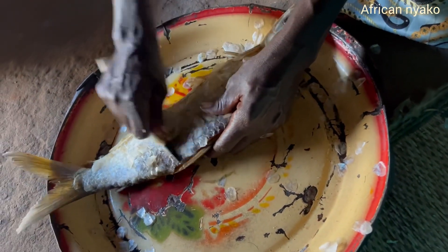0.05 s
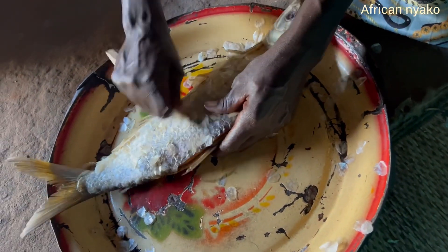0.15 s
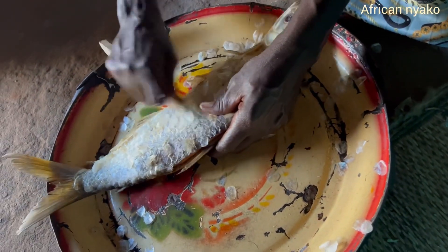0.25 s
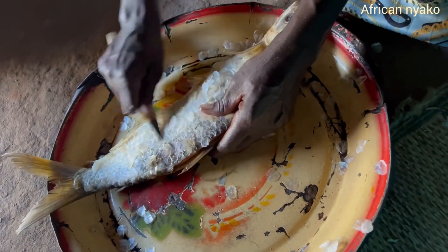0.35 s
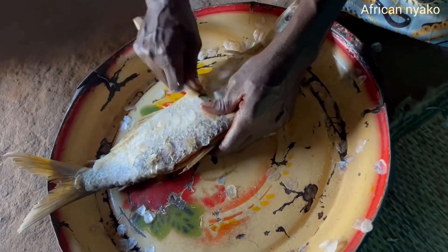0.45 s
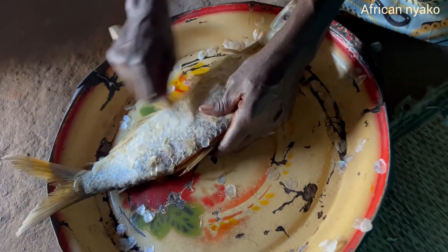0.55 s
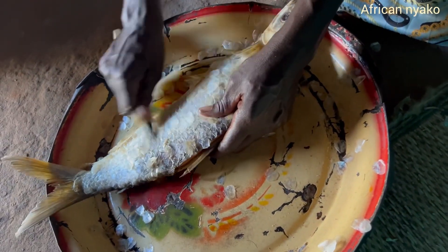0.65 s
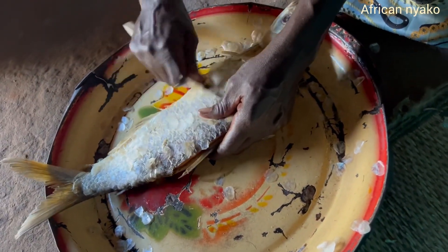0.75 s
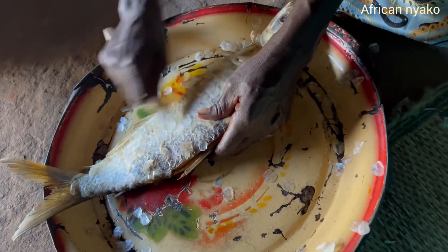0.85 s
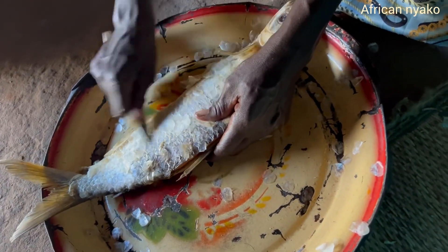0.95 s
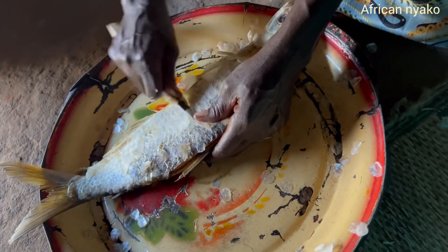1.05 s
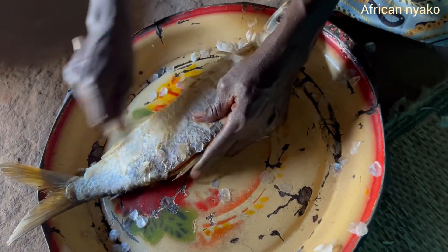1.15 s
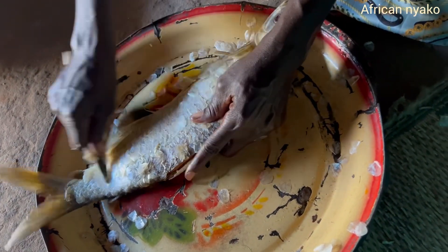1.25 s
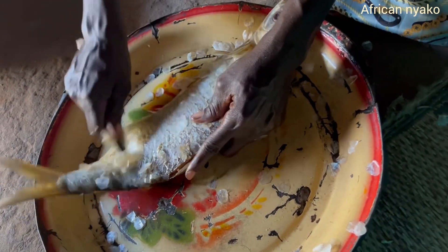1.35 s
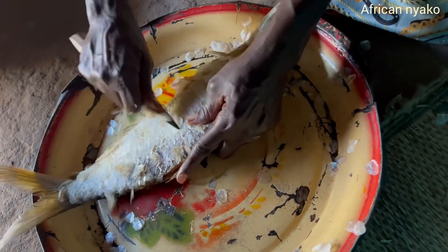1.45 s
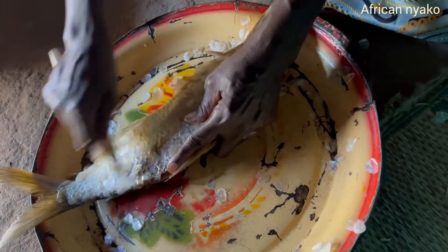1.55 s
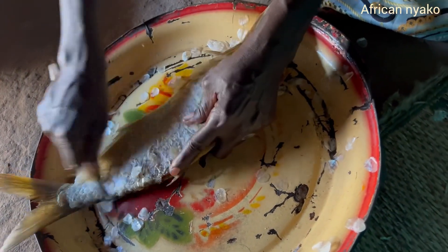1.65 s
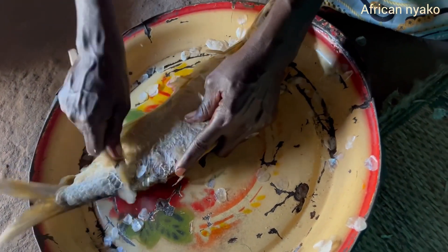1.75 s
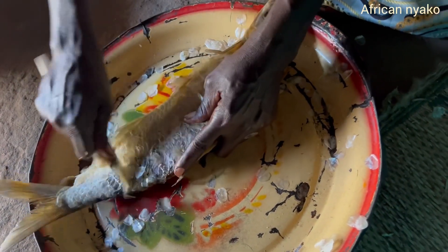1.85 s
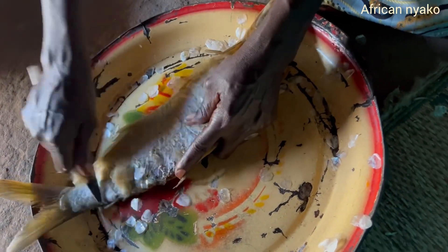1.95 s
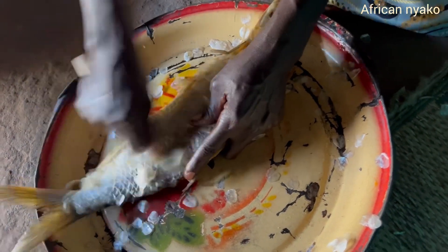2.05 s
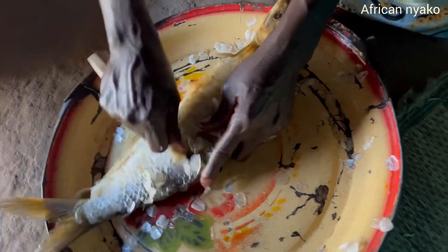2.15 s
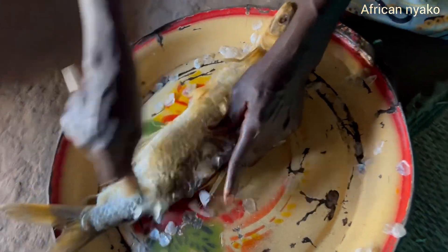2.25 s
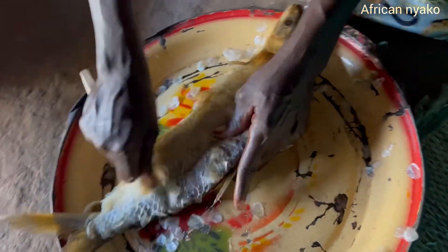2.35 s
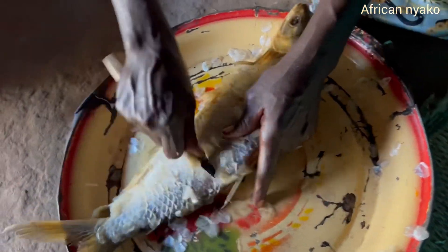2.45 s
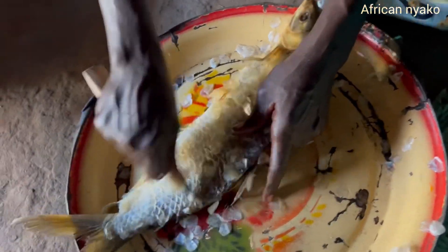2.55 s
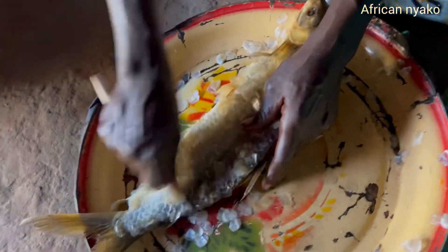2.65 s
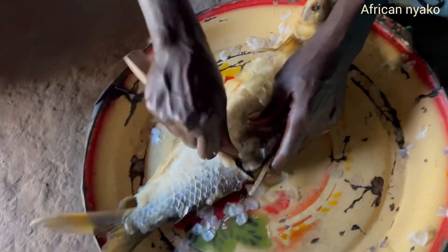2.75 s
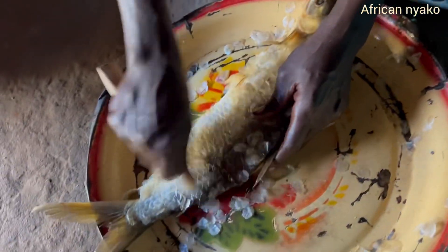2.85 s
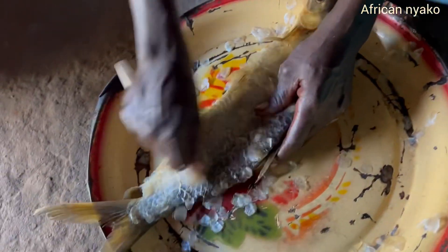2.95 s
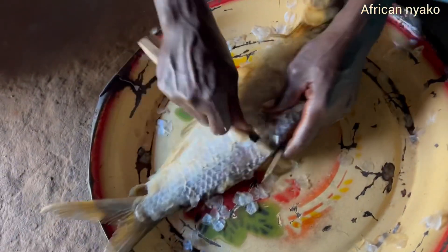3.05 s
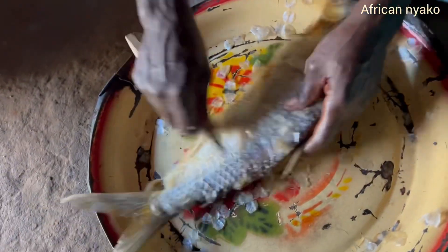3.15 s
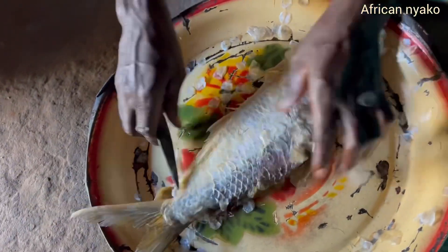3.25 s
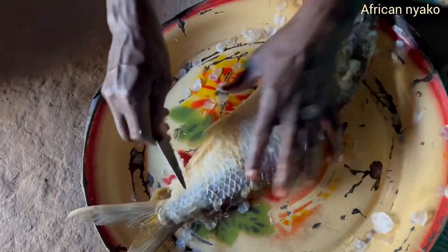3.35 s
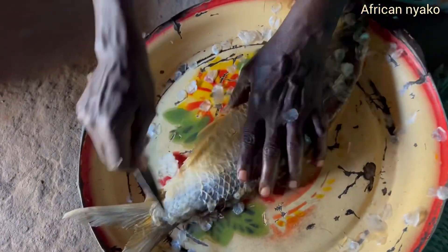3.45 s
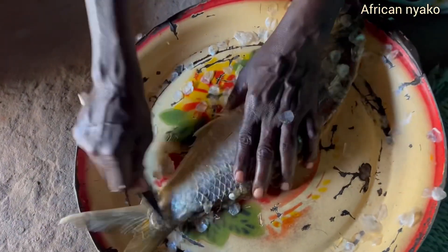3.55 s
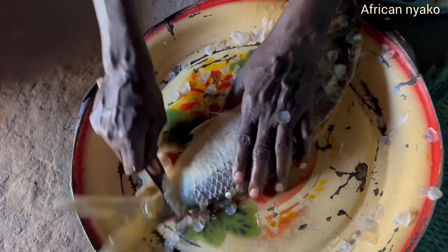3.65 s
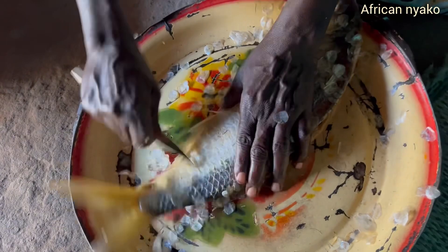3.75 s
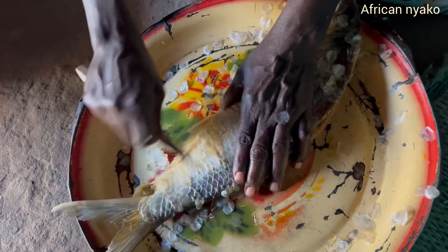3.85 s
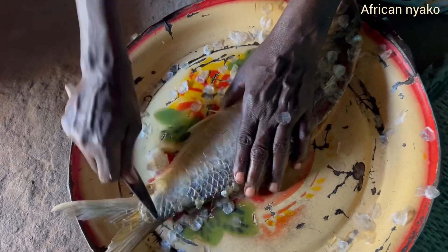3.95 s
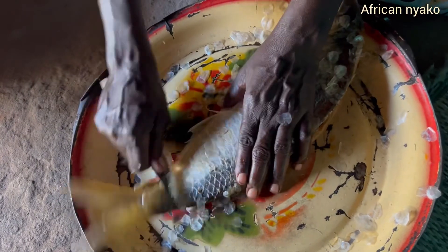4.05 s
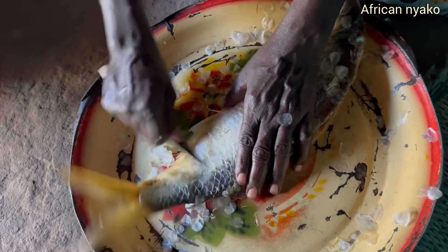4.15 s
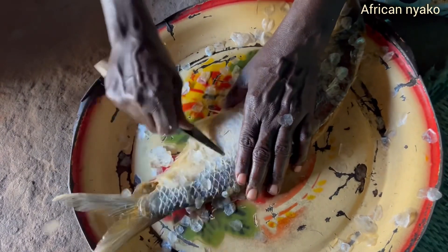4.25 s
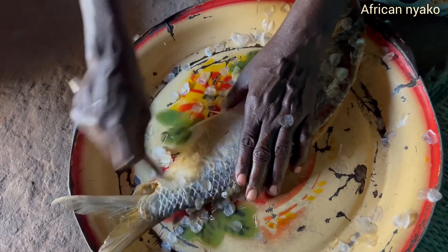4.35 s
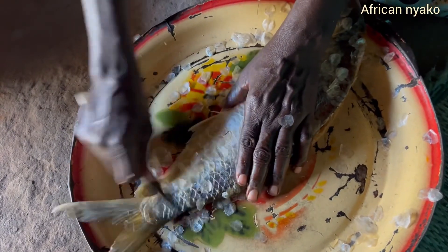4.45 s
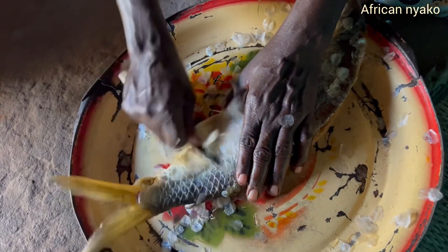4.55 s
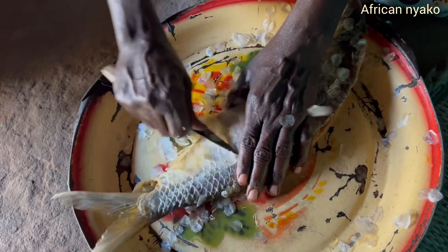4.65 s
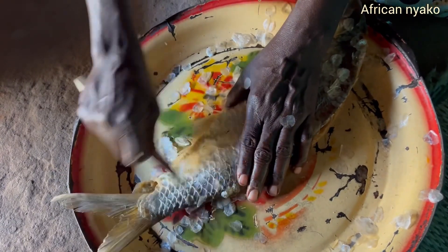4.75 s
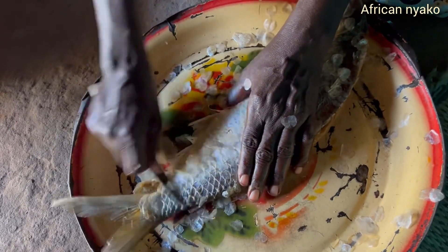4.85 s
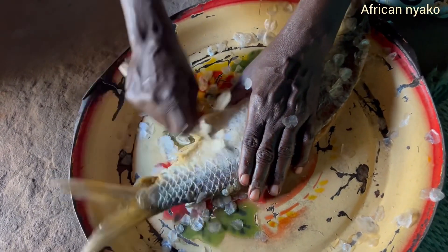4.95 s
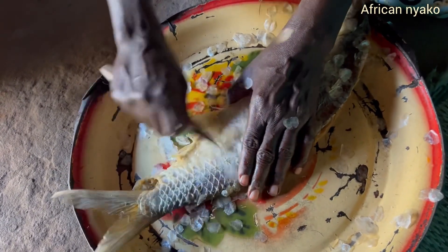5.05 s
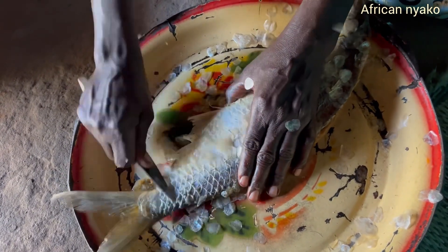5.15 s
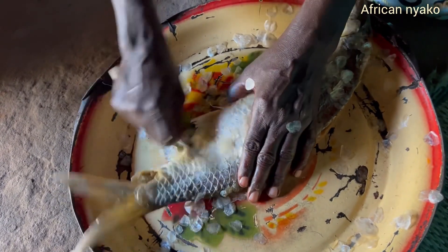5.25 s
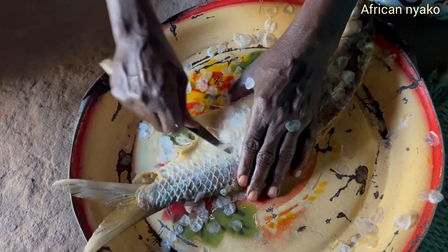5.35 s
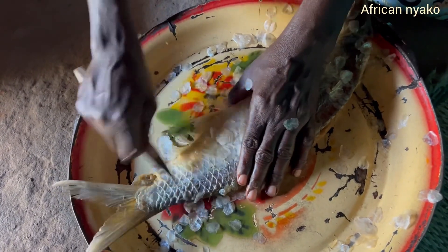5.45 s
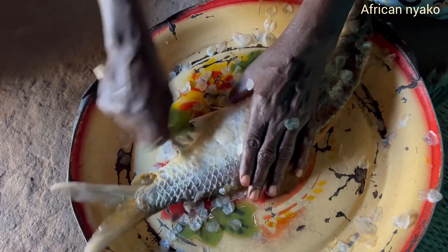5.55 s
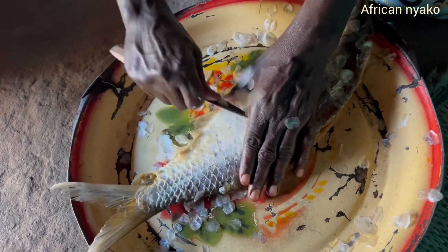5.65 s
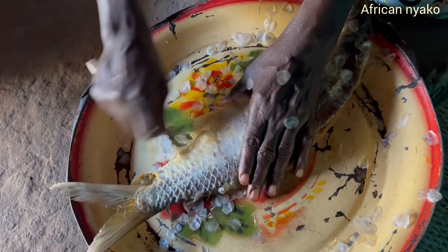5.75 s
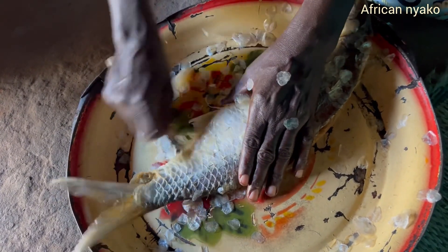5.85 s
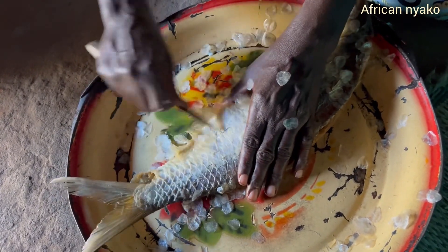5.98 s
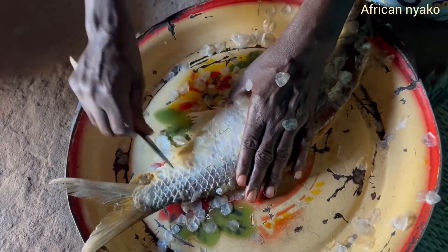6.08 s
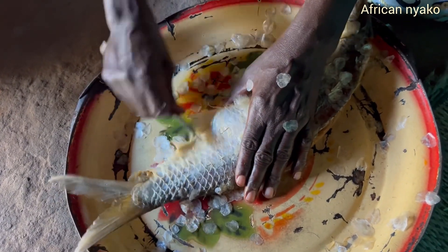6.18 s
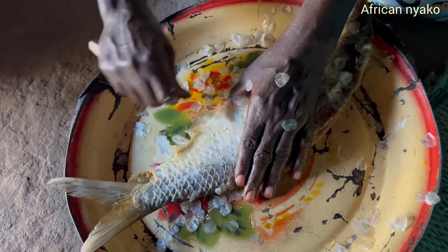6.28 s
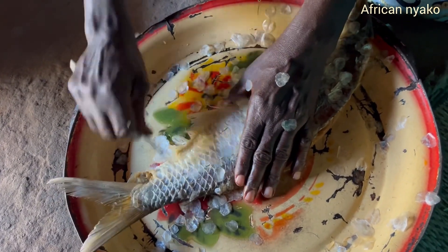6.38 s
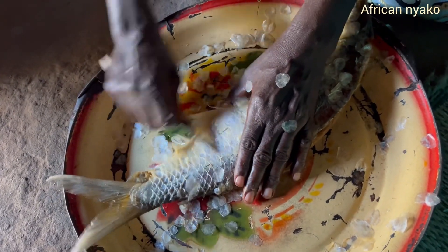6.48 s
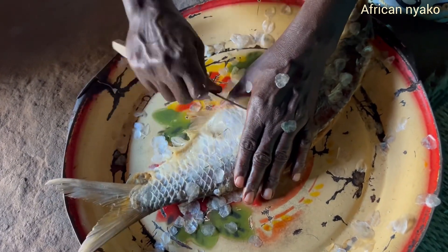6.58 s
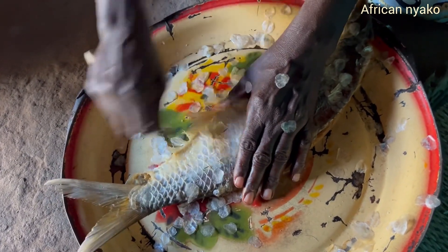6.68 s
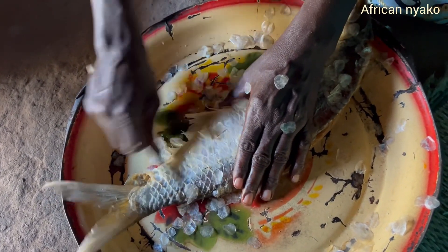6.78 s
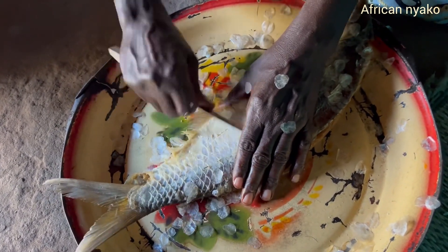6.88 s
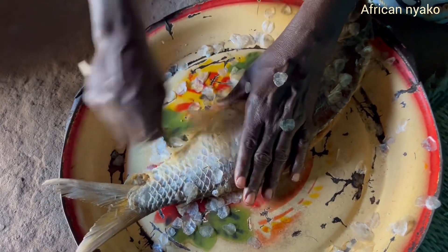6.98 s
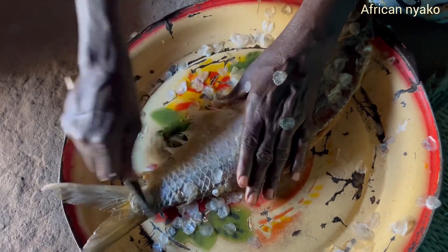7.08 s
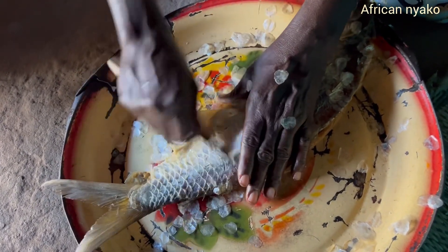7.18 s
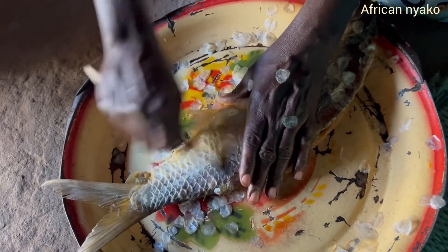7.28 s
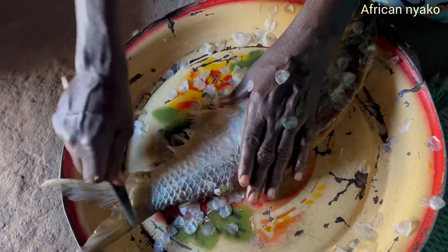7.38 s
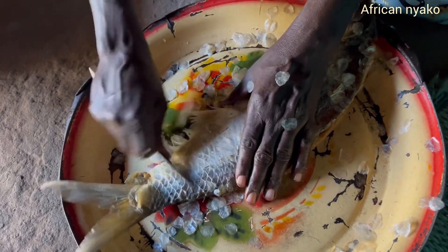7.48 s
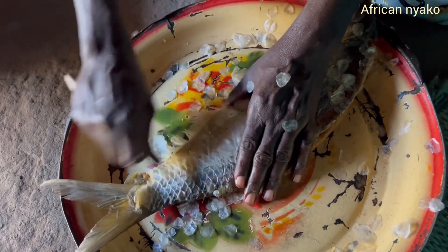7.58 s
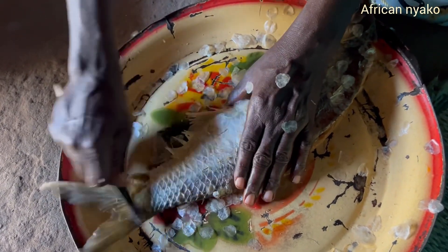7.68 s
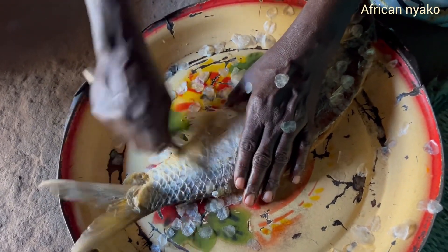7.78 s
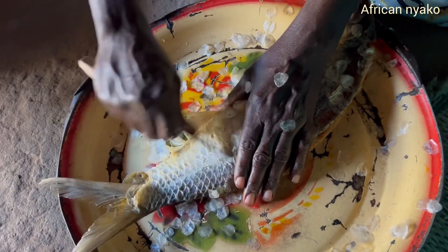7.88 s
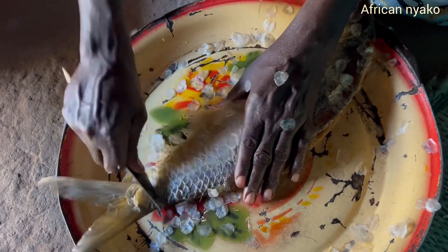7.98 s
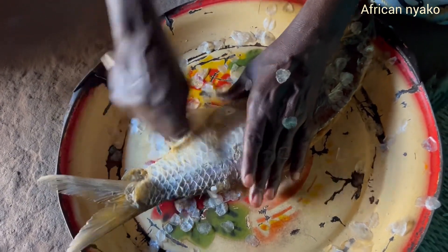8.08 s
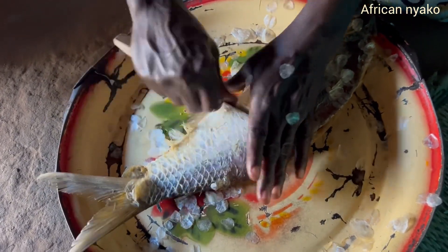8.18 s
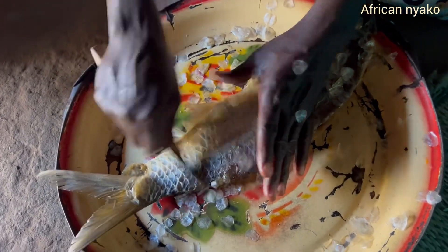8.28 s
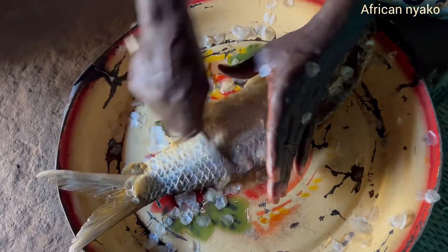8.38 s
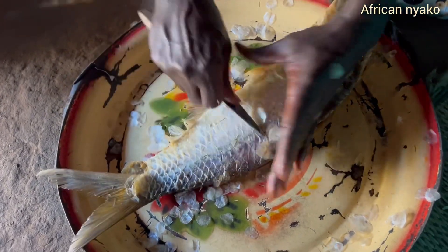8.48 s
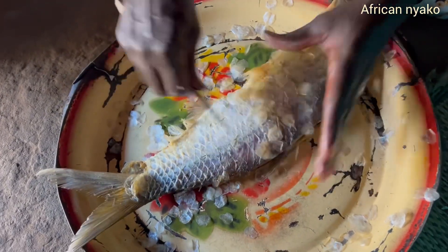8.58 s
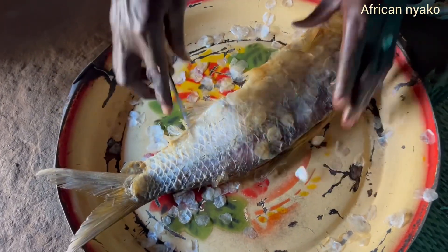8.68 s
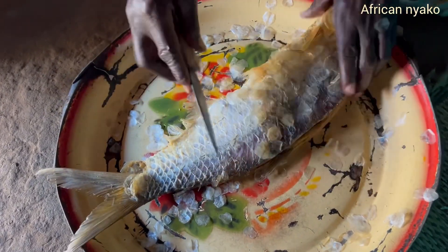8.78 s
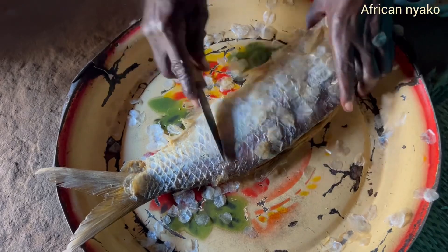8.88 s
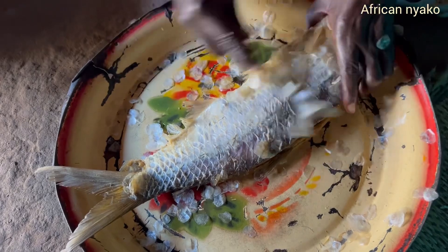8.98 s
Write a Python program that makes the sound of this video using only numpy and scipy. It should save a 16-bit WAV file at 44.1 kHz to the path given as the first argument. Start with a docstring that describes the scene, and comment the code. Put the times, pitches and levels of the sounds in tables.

```python
"""A blade rasps at once over a dried fish in an enamel basin, in a yard with a low rumble underneath.
The phone stands close: each stroke is fine cracks over a duller rub, and scales snap loose in bursts.
Blows on the basin ring briefly; the fish judders against it with groans that fall in pitch.
The knife clacks as it lands or slips off; one even scrape and one soft bump come later.
Hands, basin sides and nearby walls throw the sound back; an engine and a drone hum far off."""
import sys
import numpy as np
from scipy import signal
from scipy.fft import rfft, irfft, next_fast_len
from scipy.io import wavfile
from scipy.ndimage import uniform_filter1d, map_coordinates

SR = 44100
rng = np.random.default_rng(int(sys.argv[2]) if len(sys.argv) > 2 else 0)


def store_pcm(level_fs):
    """Save levels as 16-bit WAV."""
    pcm = np.round(np.clip(level_fs, -1, 1) * 32767).astype(np.int16)
    wavfile.write(sys.argv[1], SR, np.atleast_2d(pcm).T)


N = 397776  # length in samples
TOP_HZ = 16000  # upper band limit of the phone

# Spectrum of the cracking scales: frequency_hz, level_db (relative)
SCALE_SPECTRUM = [(600, -33.5), (1800, -15.5), (3300, -3), (5000, -2.5), (7300, 2), (9500, -1),
                  (11800, 4.5), (13500, -0.5), (15600, -0.5), (17000, 0.5)]
# Spectrum of the rubbed skin: frequency_hz, level_db (relative)
SKIN_SPECTRUM = [(50, -31.5), (130, 9), (260, 1.5), (390, 3), (480, -5), (650, 4), (900, -4.5),
                 (1150, -1.5), (1550, -1.5), (2000, -14), (3200, -11.5), (5000, -19), (9000, -27)]


def amp(db):
    """Decibels to gain."""
    return 10 ** (np.asarray(db) / 20)


def unit(x):
    """Scale to rms 1."""
    return x / np.sqrt(np.mean(x ** 2) + 1e-20)


def along(points, hz):
    """Read (Hz, value) points on a log frequency axis."""
    f, v = np.transpose(points)
    return np.interp(np.log(hz + 1), np.log(f + 1), v)


def wobble(rate):
    """A smooth random curve with this many knots a second."""
    knots = rng.standard_normal(int(N * rate / SR) + 4)
    return map_coordinates(knots, [np.arange(N) * rate / SR])


def filtered(x, response):
    """Multiply the spectrum of x by a response of frequency."""
    n = x.shape[-1]
    m = next_fast_len(n + 8192)
    return irfft(rfft(x, m) * response(np.fft.rfftfreq(m, 1 / SR)), m)[..., :n]


def coloured(x, spectrum, size=4096):
    """Pass x through a causal, minimum-phase filter with this spectrum."""
    gain = amp(along(spectrum, np.fft.rfftfreq(size, 1 / SR)))
    cepstrum = irfft(np.log(gain))
    # folding the cepstrum forward in time makes the filter causal
    cepstrum[1:size // 2] *= 2
    cepstrum[size // 2 + 1:] = 0
    return signal.fftconvolve(x, irfft(np.exp(rfft(cepstrum))))[:len(x)]


def grains(n, rate, spread_db):
    """Tiny random impulses, rate a second, of uneven size and either sign; rms 1."""
    chance, size, push = rng.random(n), rng.standard_normal(n), rng.choice([-1, 1], n)
    return unit((chance < rate / SR) * push * amp(spread_db * np.clip(size, -2, 2)))


def add(track, s, sound):
    """Mix a sound into the track at time s."""
    start = max(round(s * SR), 0)
    track[start:start + len(sound)] += sound[:max(N - start, 0)]


def yard():
    """A slowly swelling low rumble of the surroundings, almost the same at both microphone ports."""
    # rumble: frequency_hz, level_db (relative)
    rumble_spectrum = [(20, -25), (35, -19), (55, 7.5), (90, 7), (135, 1), (175, -3.5), (250, -7.5),
                       (500, -24), (1400, -38), (2500, -41), (8000, -58), (16000, -58.5)]
    shared = unit(coloured(rng.standard_normal(N), rumble_spectrum))
    apart = np.array([unit(coloured(rng.standard_normal(N), rumble_spectrum)) for port in range(2)])
    return amp(-51.0 + 2.0 * wobble(3.89)) * (shared + 0.14 * apart)


def far_hum():
    """A distant engine, slowly rising in pitch, and a drone that comes and goes: plain, slightly wavering tones."""
    # engine: time_s, pitch_hz, level_db (rms)
    engine_points = [(0, 123.2, -58.5), (2.4, 127.9, -45.5), (3.6, 133.1, -51), (6.4, 139.1, -56.5),
                     (9, 143.6, -59)]
    # drone: peak_s, half_length_s (to 1/e of the peak), level_db (rms at the peak)
    drone_swells = [(2.478, 0.22, -46), (5.155, 0.44, -49.5), (7.201, 0.23, -46)]
    t = np.arange(N) / SR

    def tone(pitch):
        """A sine of rms 1 whose pitch wanders a little."""
        cycles = np.cumsum(pitch + 0.69 * wobble(3.6)) / SR
        return np.sqrt(2) * np.sin(2 * np.pi * cycles)

    s, hz, db = np.transpose(engine_points)
    engine = amp(np.interp(t, s, db)) * tone(np.interp(t, s, hz))
    swell = sum(amp(level) * np.exp(-((t - peak) / half) ** 2) for peak, half, level in drone_swells)
    return engine + swell * tone(96.5)  # drone pitch, Hz


def pressure():
    """Crackle and rub gains: each stroke grazes, lands and bites, swells into the scales, eases and lifts."""
    # passes of the blade: landing_s, rise_s, ease_s, swell_db over the rise,
    # crackle_db of the scales and rub_db of the skin (relative, before the bite)
    stroke_table = [(0.029, 0.14, .19, 3, -38.5, -39), (0.311, 0.041, 0.16, 17, -41.5, -34),
                    (.43, 0.09, 0.061, 3.5, -44, -42), (0.61, 0.062, 0.085, 26.5, -31, -28),
                    (0.725, 0.094, 0.012, 6.5, -46, -50), (.892, 0.079, 0.052, 27, -29, -27),
                    (1.219, 0.12, 0.097, 2, -32, -36.5), (1.349, 0.08, 0.049, 18, -30.5, -26),
                    (1.586, 0.12, 0.098, -2, -36, -38.5), (1.818, 0.26, 0.15, 15, -33.5, -34.5),
                    (2.222, 0.16, 0.07, 27.5, -32, -35.5), (2.418, 0.057, 0.14, 7, -49, -45.5),
                    (2.53, 0.042, 0.0081, 15, -34.5, -47), (2.621, 0.056, 0.075, 23, -31.5, -35.5),
                    (2.76, 0.14, .08, -5.5, -53, -49.5), (2.902, 0.065, 0.064, 22.5, -32.5, -32.5),
                    (3.294, 0.022, 0.2, 1, -49, -47), (3.362, 0.027, 0.062, 18, -35.5, -35.5),
                    (3.508, 0.26, 0.082, 0, -42.5, -45), (3.951, 0.089, 0.21, 3, -40, -48),
                    (4.082, 0.1, 0.014, 0, -37.5, -51), (4.402, 0.11, 0.095, 18, -28.5, -35),
                    (4.797, 0.1, 0.094, 31.5, -29.5, -35.5), (5.141, 0.097, 0.16, 21, -33.5, -33),
                    (5.464, 0.13, 0.012, 13, -36.5, -32), (5.782, .02, 0.073, 15, -56, -47),
                    (5.821, 0.061, 0.027, 11.5, -26.5, -29), (6.106, 0.14, 0.013, -11, -44, -43),
                    (6.418, 0.081, 0.059, 8.5, -33.5, -30), (6.74, 0.092, 0.053, 8.5, -35.5, -33),
                    (7.04, 0.12, 0.049, 0, -42, -35), (7.246, 0.044, 0.0088, 21.5, -43, -53.5),
                    (7.337, 0.11, 0.097, -0.5, -41.5, -40.5), (7.624, 0.13, 0.075, 9, -37.5, -37),
                    (7.969, 0.15, 0.035, 9, -39.5, -37), (8.182, 0.075, 0.12, 5, -49, -51.5),
                    (8.348, 0.066, 0.031, 4.5, -36.5, -39), (8.481, 0.2, 0.12, 16, -57.5, -59),
                    (8.694, 0.065, 0.08, -3.5, -47.5, -43.5), (8.85, 0.13, 0.17, 24, -36, -42)]
    graze_s, graze_db = 0.022, -23.5  # the edge brushes the scale tips just before it lands
    land_s = 0.011  # the edge settles on the fish
    bite_db, bite_s = 17, 0.0088  # it digs in for a moment as it lands
    rub_share = 0.81  # the rub follows only this share of bite and swell
    ease_db = 18.5  # the hand eases off by this much after the peak
    lift_db_per_s = 211  # then the scrape dies as the blade lifts
    t = np.arange(SR * 3 // 4) / SR
    # the held fish rustles between strokes as the grip keeps shifting
    handling = amp(3.5 * wobble(14))
    crackle_power = (amp(-69) * handling) ** 2
    rub_power = (amp(-62) * handling) ** 2
    graze = amp(graze_db) * np.sqrt(t / graze_s) * (t < graze_s + land_s)
    for s, rise, ease, swell_db, crackle_db, rub_db in stroke_table:
        dig_db = bite_db * np.exp(-t / bite_s) - swell_db * np.maximum(1 - t / rise, 0)
        fade_db = ease_db * np.clip((t - rise) / ease, 0, 1)
        fade_db += lift_db_per_s * np.maximum(t - rise - ease, 0)
        contact = np.minimum(t / land_s, 1) ** 2 * amp(-fade_db)
        add(crackle_power, s - graze_s, (graze * amp(crackle_db - swell_db)) ** 2)
        add(crackle_power, s, (contact * amp(crackle_db + dig_db)) ** 2)
        add(rub_power, s, (contact * amp(rub_db + rub_share * dig_db)) ** 2)
    # the pressure wavers over the ridges of the fish
    return np.sqrt([crackle_power, rub_power]) * amp(1.5 * wobble(45))


def scale_ticks(rate, centre_hz, octaves, t60):
    """Scales flick off under the edge at random, each with a short click of its own pitch; rms 1."""
    out, t = np.zeros(N), np.arange(SR // 50) / SR
    draws = rng.standard_normal((2500, 5))
    times = np.cumsum(rng.exponential(size=len(draws))) / rate
    for s, (size, pitch, *partials) in zip(times[times < N / SR], draws):
        hz = np.minimum(centre_hz * 2 ** (octaves * pitch + 0.298 * np.array(partials)), TOP_HZ)
        click = np.sin(2 * np.pi * hz[:, None] * t).sum(axis=0)
        add(out, s, amp(6.2 * min(size, 1.5) - 60 * t / t60) * click)
    return unit(out)


def basin_ring():
    """The basin's modes, damped by the fish, after one push, at new strengths each time; rms 1."""
    # modes: frequency_hz, level_db (relative, before the random strength), t60_s
    basin_modes = [(213, 4.5, .18), (268, 6, .14), (396, 8, .08), (600, 0, .08), (660, 0, .08),
                   (780, 0, .06), (889, 0, .09), (957, -2, .08), (1188, 1, .08), (1467, 2, .06),
                   (1725, 0, .08), (1900, -3, .08), (2445, -5, .09), (2645, 1, .11), (2868, 0, .11),
                   (3093, 0, .09), (3412, 1, .06), (4130, -7, .09)]
    t = np.arange(SR // 4) / SR
    hz, level, t60 = np.transpose(basin_modes)[:, :, None]
    strength_db = rng.normal(0, 2.5, hz.shape)
    phase = rng.uniform(0, 2 * np.pi, hz.shape)
    modes = amp(level + strength_db - 60 * t / t60) * np.sin(2 * np.pi * hz * t + phase)
    return unit(np.sum(modes, axis=0))


def rasp():
    """The edge trips over rows of scales: clumps of fine cracks and flicks over a duller rub of the skin."""
    crackle_gain, rub_gain = pressure()
    # each row of scales catches the edge, lets go at once and dies away in a few ms
    hits = np.abs(grains(N, rate=130, spread_db=2.5))
    catches = signal.lfilter([1], [1, -np.exp(-1 / (0.0086 * SR))], hits)
    rows = .8 + unit(catches)
    small = scale_ticks(rate=170, centre_hz=6000, octaves=.7, t60=0.0084)
    large = scale_ticks(rate=130, centre_hz=2405, octaves=0.484, t60=0.023)
    cracks = unit(coloured(grains(N, rate=9000, spread_db=6.0) * rows, SCALE_SPECTRUM))
    crackle = (cracks + amp(-9.5) * small) * crackle_gain
    rubbing = unit(coloured(grains(N, rate=5000, spread_db=2.0) * rows, SKIN_SPECTRUM))
    rub = (rubbing + amp(-8.5) * large) * rub_gain
    # a little of the scrape passes through the fish and rings the basin
    ringing = signal.fftconvolve(crackle + 0.73 * rub, basin_ring())[:N] / np.sqrt(SR // 4)
    return amp(0.25) * crackle + amp(-1.5) * rub + amp(-23.0) * ringing


def flakes():
    """Loose scales patter into the basin as faint single ticks, each a tiny fluttering burst."""
    ticks = grains(N, rate=50, spread_db=10)
    t = np.arange(SR // 50) / SR
    flutter = rng.standard_normal(len(t)) * amp(-60 * t / 0.022)
    patter = signal.fftconvolve(ticks, flutter)[:N]
    return amp(-64) * unit(coloured(patter, SCALE_SPECTRUM))


def near_echoes(x, size=8192):
    """Hands and basin sides throw the sound back within a few ms; their colour shifts as they move."""
    t = np.arange(SR // 25) / SR
    out, padded = np.zeros((2, N + 3 * size)), np.pad(x, size)
    fade = signal.get_window("hann", size)
    # overlapping blocks, each with fresh random paths, partly shared by the two ports
    for start in range(0, N + size, size // 2):
        shared, left, right = rng.standard_normal((3, len(t))) * amp(-60 * t / 0.017) * (t > .0004)
        paths = 0.44 * shared + np.array([left, right])
        paths = paths / np.linalg.norm(paths[0])
        block = padded[start:start + size] * fade
        echo = signal.fftconvolve(block[None], paths, axes=1)
        out[:, start:start + echo.shape[1]] += echo
    colour = [(250, -34.5), (600, -3.0), (1100, -0.5), (3000, -5.5), (7000, -6), (12000, -30.0)]
    return filtered(out[:, size:size + N], lambda hz: amp(along(colour, hz)))


def walls(x):
    """A short diffuse answer from nearby walls, 5 ms late and different at each port."""
    # decay: frequency_hz, t60_s
    wall_decay = [(150, 0.24), (1500, 0.12), (6000, 0.17), (15000, 0.069)]
    hz, t, z = signal.stft(rng.standard_normal((2, SR // 2)), SR, nperseg=256)
    decay = amp(-60 * t / along(wall_decay, hz)[:, None])
    tail = signal.istft(z * decay, SR, nperseg=256)[1]
    tail = tail / np.linalg.norm(tail[0])
    late = np.pad(x, (SR // 200, 0))
    wet = signal.fftconvolve(late[None], tail, axes=1)[:, :N]
    colour = [(100, -30.5), (350, -16.5), (1200, -11.0), (4000, -12.5), (12000, -30)]
    return filtered(wet, lambda f: amp(along(colour, f)))


def snaps():
    """A scale tears loose in a burst of bright cracks that dies within some 20 ms."""
    # scales that snap off, from loud bursts to faint ticks: start_s, level_db (relative)
    snap_table = [(0.046, -10.5), (0.07, -16.5), (0.954, -17), (1.3524, -8), (1.408, -6), (2.0185, -8.5),
                  (2.0633, -14.5), (2.356, -10), (2.371, -10.5), (2.828, -23.5), (2.843, -22),
                  (2.9852, -6.5), (3.238, -19.5), (3.7192, -11), (3.777, -14), (4.016, -12), (4.125, -9.5),
                  (4.734, -32), (4.8088, -16), (4.893, -7), (4.9206, -10), (5.15, -19.5), (5.297, -14),
                  (5.477, -24), (5.569, -14), (6.1958, -10.5), (6.435, -5), (6.4893, -9.5), (6.83, -19.5),
                  (6.8524, -13.5), (7.4364, -15), (8.102, -34), (8.2658, -21), (8.432, -21), (8.536, -39.5),
                  (8.6, -32.5), (8.653, -34), (8.91, -32), (8.96, -26)]
    out, t = np.zeros(N), np.arange(SR // 20) / SR
    for s, db in snap_table:
        cracks = grains(len(t), rate=14000, spread_db=3)
        envelope = amp(-60 * t / 0.022) * (1 - np.exp(-t / 0.0003))
        burst = coloured(cracks * envelope, SCALE_SPECTRUM)
        # levelled on its first 4 ms
        add(out, s, amp(db - 11.0) * burst / np.sqrt(np.mean(burst[:SR // 250] ** 2)))
    return out


def knocks():
    """The contact chatters; each blow brings out its own band of the basin's modes, some narrow, some wide."""
    # blade or fish strikes the basin: start_s, level_db (relative), centre_hz, spread_octaves
    knock_table = [(.318, -20.5, 1770, 0.54), (.359, -26, 2180, 1.7), (.625, -21.5, 1810, 0.58),
                   (0.658, -21.5, 2200, 1.4), (0.913, -19.5, 1530, 0.6), (0.952, -22.5, 1930, 1.6),
                   (1.408, -18, 2000, 2), (1.602, -29, 1570, 1.2), (2.065, -28, 2160, 1.8),
                   (4.127, -31, 2600, 1.7), (5.156, -26, 1470, 1.26), (5.167, -30, 1700, 1.3),
                   (6.11, -15.5, 1960, 1.44), (6.118, -20, 2300, 0.87), (6.158, -20.5, 1820, 1.34),
                   (6.427, -12.5, 1900, 1.34), (6.437, -10, 2300, 0.93), (6.461, -21, 2410, 1.4),
                   (8.703, -32.5, 1350, 1.7)]
    chatter_spectrum = [(100, 2), (400, 10.5), (3500, 5), (7000, 4.5), (16000, -44.0)]
    out, t = np.zeros(N), np.arange(SR // 4) / SR
    grid = np.geomspace(60, 17000, 100)  # Hz
    for s, db, centre_hz, spread in knock_table:
        chatter = coloured(grains(len(t), rate=4600, spread_db=4.5), chatter_spectrum)
        chatter = chatter * amp(-60 * t / 0.067)
        blow = (basin_ring() + 1.3 * unit(chatter)) * (1 - np.exp(-t / 0.0002))
        focus_db = -11 * np.log10(1 + (np.log2(grid / centre_hz) / spread) ** 4)
        # the push itself always reaches the low modes
        floor_db = np.where(grid < centre_hz, 5 * spread - 15, -40)
        blow = coloured(blow, np.c_[grid, np.maximum(focus_db, floor_db)])
        # levelled on its first 10 ms
        add(out, s, amp(db - 2.0) * blow / np.sqrt(np.mean(blow[:SR // 100] ** 2)))
    return out


def resonance(x, hz, t60):
    """Pass x through a resonance whose pitch changes from sample to sample; rms 1."""
    turn = np.exp(2j * np.pi * np.cumsum(hz) / SR)
    # shift the pitch down to zero, let it ring there, shift it back
    ring = signal.lfilter([1], [1, -np.exp(-np.log(1000) / (t60 * SR))], x / turn)
    return unit(np.real(turn * ring))


def groans():
    """The fish sticks and slips; slips drive its body resonance, which sinks as the blade moves along."""
    # judders on the basin: peak_s, rise_s, hold_s (sagging after the peak), level_db (relative),
    # pitch_hz (passed 12 ms after the peak)
    drag_table = [(0.66, 0.044, 0.0028, -25.5, 293), (0.944, 0.072, 0.016, -32.5, 300),
                  (1.377, 0.025, 0.013, -27, 220), (1.999, 0.05, 0.037, -31, 420),
                  (2.336, 0.037, 0.054, -31, 402), (2.642, 0.019, 0.085, -33, 380),
                  (2.936, 0.03, 0.046, -30, 422), (3.244, 0.015, 0.0077, -33, 416),
                  (3.738, 0.012, 0.0085, -21.5, 323), (4.016, 0.039, 0.0098, -24, 386),
                  (4.131, 0.011, 0.049, -26.5, 298), (4.456, 0.03, 0.046, -25, 473),
                  (4.514, 0.034, 0.047, -28, 288), (4.871, 0.061, 0.017, -20.5, 323),
                  (4.905, .012, 0.039, -24.5, 268), (5.21, 0.06, 0.017, -21, 293),
                  (5.52, 0.021, 0.065, -23.5, 306), (5.831, 0.014, 0.045, -19, 239),
                  (6.165, 0.047, 0.0052, -25.5, 300), (6.432, 0.021, 0.051, -23.5, 331),
                  (6.776, 0.035, 0.062, -25, 350), (7.121, 0.043, 0.049, -21.5, 323),
                  (7.447, 0.011, 0.033, -18, 406), (7.73, 0.006, 0.016, -17.5, 446),
                  (7.765, .02, 0.026, -20.5, 286), (8.028, 0.034, 0.029, -21, 480),
                  (8.054, .02, .03, -26.5, 270), (8.282, 0.011, 0.016, -38.5, 374),
                  (8.351, 0.045, 0.073, -35, 350), (8.871, 0.0096, 0.0051, -25.5, 308)]
    # dull grit of the belly: frequency_hz, level_db (relative)
    belly_spectrum = [(60, -15.5), (130, -5), (210, 6), (320, 1), (400, 3.5), (480, -10.5), (590, 3.5),
                      (700, -2.5), (800, -15), (1300, -14), (2000, -22.5), (5000, -37)]
    judder_spectrum = [(60, -31.5), (170, 8.5), (700, -7.5), (1500, -21.5), (4000, -15)]
    sink_octaves_per_s, body_t60_s = 11.26, 0.052
    out, t = np.zeros(N), np.arange(SR // 3) / SR
    for s, rise, hold, db, hz in drag_table:
        corners_s = np.cumsum([0, rise, hold, .06, .1])
        force = amp(np.interp(t, corners_s, [-29.5, 3.0, -8.0, -28.5, -54.0]))
        pitch = hz * 2 ** np.clip(-sink_octaves_per_s * (t - rise - .012), -.8, .6)
        slips = grains(len(t), rate=900, spread_db=3)
        judder = resonance(slips, pitch, body_t60_s)
        judder = judder + amp(-9) * resonance(slips, 1.7 * pitch, body_t60_s)
        grit = coloured(grains(len(t), rate=1500, spread_db=4), belly_spectrum)
        body = unit(coloured(judder, judder_spectrum)) + amp(-7) * unit(grit)
        # the hand's force, not the single slip, sets the loudness
        local_power = np.abs(uniform_filter1d(body ** 2, size=700))
        steady = body / np.sqrt(local_power + 1e-3 * np.mean(body ** 2))
        add(out, s - rise, amp(db + 0.47) * force * steady)
    return out


def clacks():
    """A brief, damped woody knock with a dry scuff at the contact; the grip changes its ring each time."""
    # the knife lands on the fish or slips off it: start_s, level_db (relative)
    clack_table = [(2.42, -38.5), (3.777, -28), (3.835, -45.5), (3.962, -36), (4.177, -29.5),
                   (4.414, -36.5), (4.591, -33.5), (4.81, -31.5), (4.972, -35), (5.326, -39), (5.478, -40),
                   (5.794, -41), (7.05, -36), (7.347, -37), (7.637, -43.5), (7.985, -43)]
    # knife in its wooden handle: frequency_hz (before the grip shifts it), level_db (relative), t60_s
    knife_modes = [(399, -9.5, 0.19), (668, -11.5, 0.047), (890, -5, 0.086), (1148, 1.5, 0.076),
                   (1270, -1, .03), (1537, -6.5, .03)]
    out, t = np.zeros(N), np.arange(SR // 8) / SR
    hz, level, t60 = np.transpose(knife_modes)[:, :, None]
    for s, db in clack_table:
        strength, grip, phase = rng.standard_normal((3, *hz.shape))
        cycles = hz * (1 + .035 * grip) * t + phase
        modes = amp(level + 3 * strength - 60 * t / t60) * np.sin(2 * np.pi * cycles)
        ring = np.sum(modes, axis=0)
        scuff = coloured(rng.standard_normal(len(t)), SKIN_SPECTRUM) * amp(-60 * t / 0.072)
        clack = (unit(ring) + .8 * unit(scuff)) * (1 - np.exp(-t / .001))
        # levelled on its first 10 ms
        add(out, s, amp(db + 0.5) * clack / np.sqrt(np.mean(clack[:SR // 100] ** 2)))
    return out


def slide():
    """The fish is pulled across the basin: countless fine contacts blur into a dense, even rasp."""
    # the pull: time_s, level_db (relative)
    slide_points = [(2.96, -70), (2.99, -42), (3.04, -34.5), (3.11, -32.5), (3.175, -29.5), (3.225, -45.5),
                    (3.29, -49.5)]
    # its colour: frequency_hz, level_db (relative)
    slide_spectrum = [(88, -49), (150, -11), (172, -11), (601, -1.5), (8400, -13), (10000, -10),
                      (11900, -5.5), (13700, -11), (16000, -13.5)]
    t = np.arange(N) / SR
    level_db = np.interp(t, *np.transpose(slide_points), left=-np.inf, right=-np.inf)
    return amp(level_db + 1.5) * unit(coloured(rng.standard_normal(N), slide_spectrum))


def bump():
    """A soft, deep thud: a decaying low sine of a few cycles."""
    # the thud: start_s, level_db (relative), pitch_hz
    thud = (4.135, -31, 66)
    s, db, hz = thud
    t = np.maximum(np.arange(N) / SR - s, 0)
    return amp(db - 60 * t / 0.19) * np.sin(2 * np.pi * hz * t)


def scene():
    """The basin reaches the two ports at slightly different level and delay, amid walls, yard and far hum."""
    # level between the ports: frequency_hz, left_minus_right_db
    port_balance = [(200, 2), (380, -2), (700, 5.5), (1290, 2), (4400, 5), (8500, 1), (15000, -1)]
    # phase between the ports: frequency_hz, left_lead_radians
    port_lead = [(100, 0), (1200, .5), (3400, .7), (6400, .1), (8600, 0), (15700, -12.57)]
    basin = rasp() + flakes() + snaps() + knocks() + groans() + clacks() + slide() + bump()
    side = np.array([[.5], [-.5]])  # left, right

    def ports(hz):
        """Level and phase of each port."""
        lead = np.interp(hz, *np.transpose(port_lead))
        return amp(side * along(port_balance, hz)) * np.exp(1j * side * lead)

    close = filtered(amp(-0.5) * basin + near_echoes(basin), ports)
    return close + walls(basin) + yard() + far_hum()


def record(dry):
    """The phone clips at full scale and keeps nothing above its band limit."""
    return filtered(np.clip(dry, -1, 1), lambda hz: hz < TOP_HZ)


dry = scene()
out = record(dry)
store_pcm(out)
```